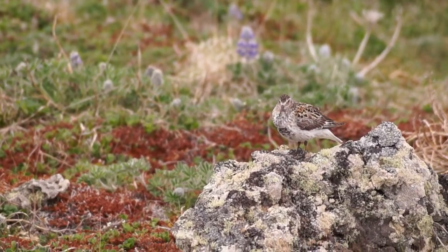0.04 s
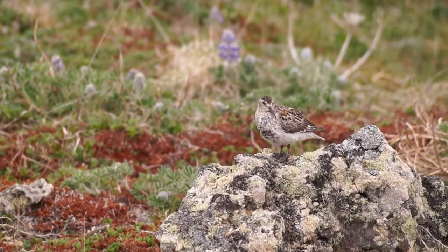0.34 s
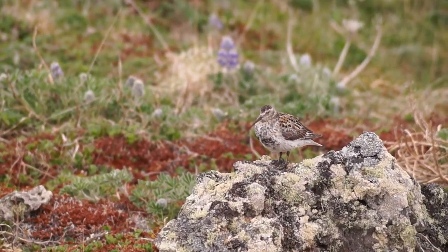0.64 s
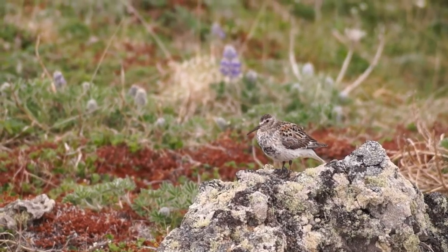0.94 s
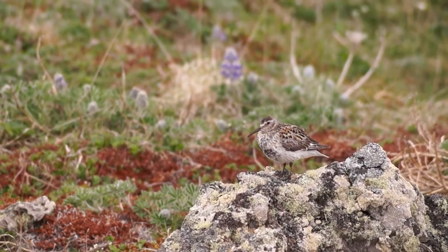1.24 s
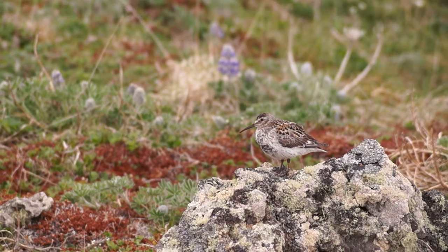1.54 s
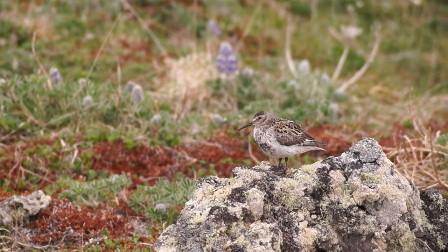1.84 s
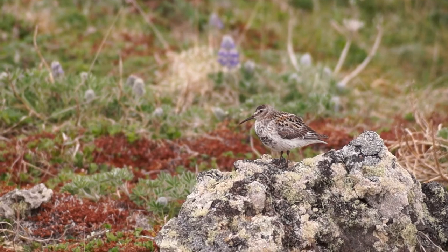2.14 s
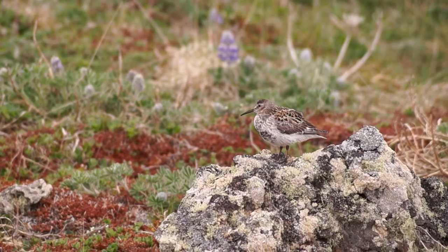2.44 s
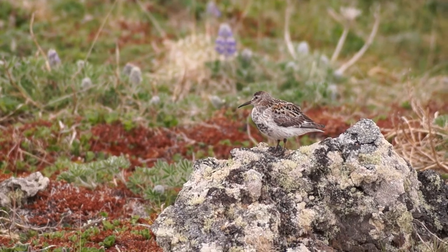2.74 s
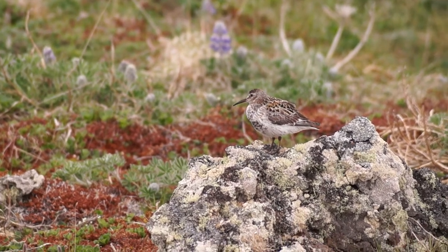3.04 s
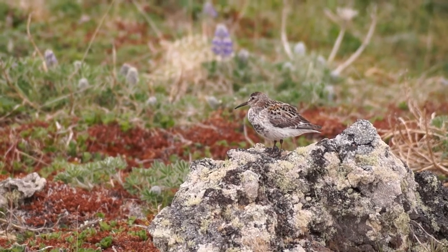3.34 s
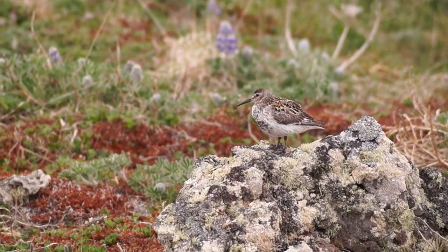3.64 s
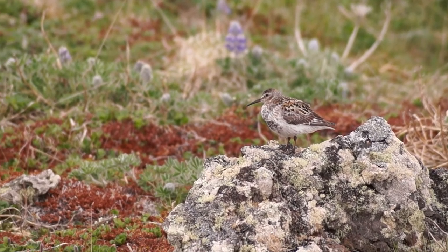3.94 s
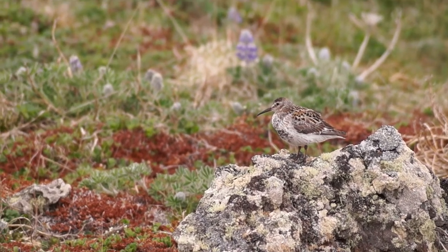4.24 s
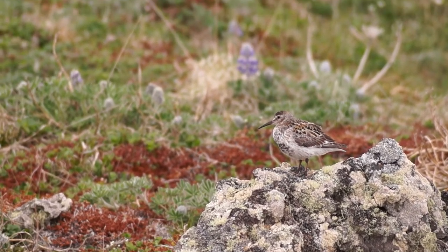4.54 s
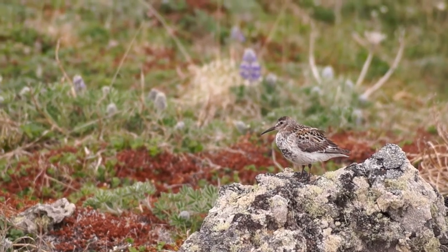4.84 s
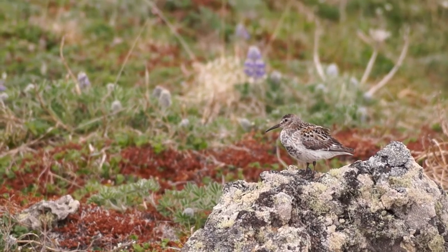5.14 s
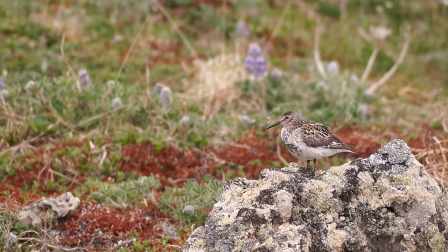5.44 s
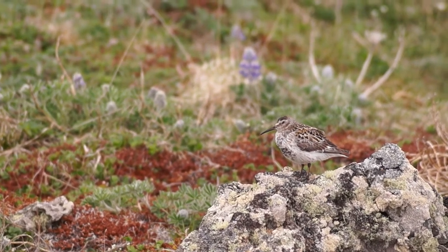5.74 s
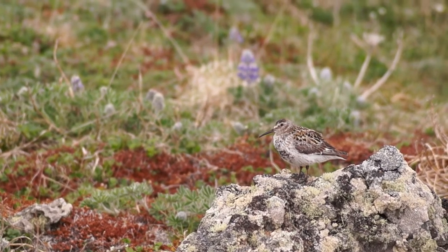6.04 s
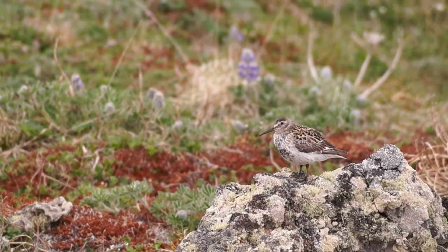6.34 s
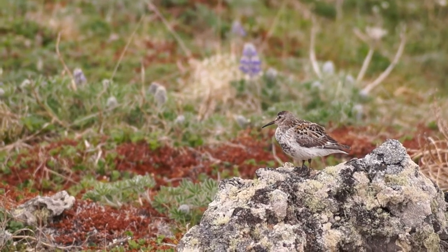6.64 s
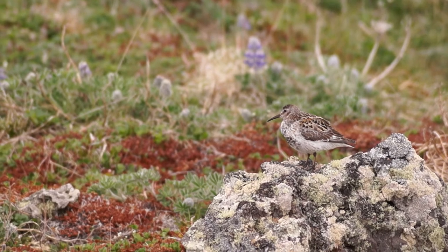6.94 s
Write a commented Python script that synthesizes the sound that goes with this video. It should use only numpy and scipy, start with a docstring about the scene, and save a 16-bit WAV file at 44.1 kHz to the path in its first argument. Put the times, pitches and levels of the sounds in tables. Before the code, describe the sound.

A soft, steady hiss of distant air runs throughout, in open tundra. Short puffs of wind bump the microphone in the first half second. From about 0.8 to 2 seconds a strong gust, the loudest sound, buffets it with low rumbling, thumps and brief spits; one tiny tick sounds on the left at 1.4 seconds. At about 1.7 seconds a small songbird, some way off to the right, begins a faint jingling phrase of high whistles, trills and buzzes. It repeats the phrase from about 3.8 seconds, fading out by 5.2. Separate wind puffs keep thumping under the song, the hardest near 2.7 seconds. A milder gust rumbles from 4.9 to 5.3 seconds, with a few small puffs just before 6. A second, far fainter bird calls behind the song and gives three tiny chips around 6.2 seconds. The wind settles, leaving hiss until about 7 seconds.

```python
"""Songbird on windy tundra

A small songbird sings one jingling phrase twice, some way off to the right. The two sides of its
voice box overlap pure whistles with warbled trills and buzzes; a second bird calls far off.
Gusts buffet the microphone's two ports with rumbling eddies, thumps and spits, over a steady
hiss of far air. One tiny tick sounds on the left."""
import sys
import numpy as np
from scipy import signal
from scipy.fft import rfft, irfft, next_fast_len
from scipy.io import wavfile
from scipy.ndimage import uniform_filter1d

SR = 44100
rng = np.random.default_rng(int(sys.argv[2]) if len(sys.argv) > 2 else 0)


def to_wav(s):
    """Save 16-bit WAV."""
    ch = np.atleast_2d(s).T  # columns
    pcm = np.round(np.clip(ch, -1, 1) * 32767)  # PCM
    wavfile.write(sys.argv[1], SR, pcm.astype(np.int16))


N = 312669


def gain_of(db):
    """Decibels to amplitude."""
    return 10 ** (np.asarray(db) / 20)


def unit_rms(x):
    """Scales to an rms of one."""
    return x / np.sqrt(np.mean(x ** 2) + 1e-20)


def bins():
    """The frequencies of a full-length spectrum."""
    return np.fft.rfftfreq(N, 1 / SR)


def curve(points):
    """Draws breakpoints across the spectrum on a logarithmic frequency axis."""
    hz, value = np.transpose(points)
    return np.interp(np.log(bins() + 1), np.log(hz + 1), value)


def add(mix, start_s, sound):
    """Mixes a sound in at its start time."""
    part = mix[max(round(start_s * SR), 0):][:len(sound)]
    part += sound[:len(part)]


def wander(rate_hz):
    """Smooth random modulation of unit rms, moving at up to about the given rate."""
    size = next_fast_len(N, True)
    smooth = np.exp(-(np.fft.rfftfreq(size, 1 / SR) / rate_hz) ** 2)
    return unit_rms(irfft(rfft(rng.standard_normal(size)) * smooth, size)[:N])


def jitter(count, span):
    """A short random wobble of unit rms, smoothed over span samples."""
    return unit_rms(uniform_filter1d(rng.standard_normal(count + span), span)[:count])


def port_noise(coherence, lead):
    """Spectra of white noise at two microphone ports, partly alike, the right one lagging."""
    left, other = rfft(rng.standard_normal((2, N)))
    shared = np.clip(curve(coherence), 0, 1)
    right = shared * left + np.sqrt(1 - shared ** 2) * other
    return np.array([left, right * np.exp(-1j * curve(lead))])


def coloured(spectra, colour):
    """Turns noise spectra into sound with the given EQ curve and unit rms."""
    return unit_rms(irfft(spectra * gain_of(curve(colour)), N))


# tone of the air bed: (frequency [Hz], relative level [dB])
AIR_COLOUR = [(12, -39), (20, -6), (56, -12), (161, -26), (215, -8), (312, -2), (463, -5), (528, -5.5),
              (572, -4), (872, -4.5), (969, -6.5), (1440, -9), (1830, -12), (2080, -15), (11000, -28),
              (14300, -61), (22000, -120)]
# how alike its two sides are: (frequency [Hz], coherence [0-1])
AIR_COHERENCE = [(60, 0.54), (170, 0.53), (300, 0.87), (500, 0.65), (900, 0.96), (1500, 0.2), (2500, 0.033),
                 (5000, 0.04), (10000, 0.42)]
# how far its left side leads: (frequency [Hz], phase [rad])
AIR_PHASE = [(100, 0.11), (330, 0.3), (900, 1), (1500, 0.007), (3000, 0.27)]
# its lean in the stereo field: (frequency [Hz], left minus right [dB])
AIR_PAN = [(100, 5), (400, -3), (1300, -4), (3000, -0.5), (9000, 0.1)]


def far_air(level_db=-50.5, sway_db=0.95, sway_hz=0.5):
    """A bed of distant wind and microphone hiss, swaying gently in level."""
    pan = gain_of(np.outer([.5, -.5], curve(AIR_PAN)))
    sway = gain_of(level_db + sway_db * wander(sway_hz))
    return sway * coloured(port_noise(AIR_COHERENCE, AIR_PHASE) * pan, AIR_COLOUR)


# the breeze under everything: (time [s], strength [dB])
BREEZE_ENVELOPE = [(0, -57), (.72, -62), (2.05, -41), (3.3, -44.5), (3.42, -59), (3.62, -56), (4.05, -51.5),
                   (4.5, -55.5), (5.55, -61.5), (6.1, -64.5), (7.09, -66)]
# short separate puffs: (peak time [s], length [s], strength [dB])
WIND_PUFFS = [(0.031, 0.097, -29), (0.292, 0.055, -42), (0.409, 0.036, -24.5), (0.488, 0.11, -37),
              (2.055, 0.034, -28.5), (2.19, .04, -36.5), (2.287, 0.021, -43), (2.39, 0.064, -40),
              (2.521, 0.022, -30.5), (2.594, 0.042, -29.5), (2.649, .05, -20.5), (2.782, 0.042, -25.5),
              (2.884, 0.065, -38.5), (2.97, 0.04, -32), (3.118, 0.024, -28.5), (3.265, 0.074, -31.5),
              (3.707, .09, -32), (3.841, 0.039, -31), (4.091, 0.036, -39), (4.336, 0.022, -39.5),
              (4.675, 0.03, -41), (5.686, 0.06, -33.5), (5.829, 0.063, -39.5), (5.929, 0.048, -44.5),
              (6.756, .12, -57)]
# two long gusts, strong then mild: (time [s], relative strength [dB])
STRONG_GUST_ENVELOPE = [(0.755, -46), (0.769, -24.5), (0.851, -16), (0.887, -32), (0.905, -17.5),
                        (1.077, -19.5), (1.189, -30), (1.223, -15.5), (1.239, -25.5), (1.605, -21.5),
                        (1.623, -20), (1.751, -28.5), (1.845, -20.5), (1.861, -25), (1.923, -31),
                        (1.953, -21), (2.117, -43.5), (2.15, -54)]
MILD_GUST_ENVELOPE = [(4.8, -72), (4.866, -37.5), (5.112, -33), (5.148, -38.5), (5.268, -38), (5.5, -62.5)]


def wind_strength(strong_db=2.5, mild_db=1.0, flutter_db=1.5, flutter_hz=18):
    """The wind's envelope in dB: a fluttering breeze and gusts add their power to bell-shaped puffs."""
    t = np.arange(N) / SR
    sustained = gain_of(np.interp(t, *np.transpose(BREEZE_ENVELOPE))) ** 2
    for gust, trim_db in ((STRONG_GUST_ENVELOPE, strong_db), (MILD_GUST_ENVELOPE, mild_db)):
        gust_db = np.interp(t, *np.transpose(gust), left=-np.inf, right=-np.inf)
        sustained += gain_of(gust_db + trim_db) ** 2
    puffs = sum(gain_of(db) ** 2 * np.exp(-(2 * (t - peak) / length) ** 2)
                for peak, length, db in WIND_PUFFS)
    flutter = gain_of(flutter_db * wander(flutter_hz))
    return 10 * np.log10(sustained * flutter ** 2 + puffs)


# tone of the turbulence: (frequency [multiples of the eddy rate], relative level [dB])
EDDY_COLOUR = [(.1, -28), (.2, -16.5), (.45, -4.5), (.85, 2), (1.3, -2.5), (2, -13), (3.3, -27.5), (6, -34),
               (10, -58), (20, -84), (60, -100)]
# surges that brighten the strong gust: (time [s], eddy rate [Hz])
GUST_SURGES = [(.76, 150), (.85, 308), (.91, 190), (1.01, 300), (1.12, 187), (1.23, 257), (1.34, 205),
               (1.53, 302), (1.68, 226), (2.1, 155)]
# how alike the wind is at the two ports: (frequency [Hz], coherence [0-1])
WIND_COHERENCE = [(50, 0.92), (130, 0.93), (300, 0.93), (500, 0.73), (900, 1), (2000, 0.68), (4000, 0.49)]
# how far the left port leads: (frequency [Hz], phase [rad])
WIND_PHASE = [(30, .1), (110, 0.69), (230, 1.31), (480, 1.67), (750, 2), (1400, 2.27), (2200, 3.1)]


def eddies(strength_db, calm_hz=91, gust_hz=155, full_gust_db=-14, doubling_db=13.5):
    """Eddies pass faster as the wind strengthens or surges, so their rumble slides upward."""
    eddy_hz = calm_hz + gust_hz * 2 ** ((strength_db - full_gust_db) / doubling_db)
    surge_hz = np.interp(np.arange(N) / SR, *np.transpose(GUST_SURGES), left=0, right=0)
    eddy_hz = np.where(surge_hz > 0, surge_hz, eddy_hz)
    noise, rumble = port_noise(WIND_COHERENCE, WIND_PHASE), 0
    rates_hz = np.geomspace(90, 340, 5)
    for rate, share in zip(rates_hz, np.eye(len(rates_hz))):
        colour = [(multiple * rate, db) for multiple, db in EDDY_COLOUR]
        crossfade = np.interp(eddy_hz, rates_hz, share)
        rumble = rumble + crossfade * coloured(noise, colour)
    return rumble


def buffeting(level_db=-1.02, right_db=0.65, lumps_db=3.0, lumps_hz=50,
              fine_hz=800, crackle_db=8.0, crackle_hz=110):
    """Turbulence at the ports: a lumpy rumble whose finest eddies come in crackling bursts."""
    strength_db = wind_strength()
    flow = eddies(strength_db)
    fine = irfft(rfft(flow) / (1 + (fine_hz / (bins() + 1)) ** 4), N)
    bursts = unit_rms(gain_of(crackle_db * wander(crackle_hz)))
    flow += fine * (bursts - 1)
    flow *= gain_of(lumps_db * wander(lumps_hz))
    flow /= np.sqrt(uniform_filter1d((flow ** 2).mean(0), size=2000))  # lumps share the gust's energy
    return flow * gain_of(strength_db + level_db) * gain_of([[0], [right_db]])


# the hardest single eddies: (time [s], relative peak [dB])
EDDY_HITS = [(0.403, -16), (0.417, -10.5), (0.774, -15.5), (0.794, -17), (0.901, -9), (1.063, -7.5),
             (1.446, -10), (1.843, -3.5), (1.957, -7.5), (2.59, -16), (2.651, -17), (3.265, -19.5),
             (3.821, -22.5), (4.09, -29), (5.67, -20)]


def thumps(level_db=-3, half_width_s=0.00095, crossing_s=0.0011):
    """An eddy gives one push and pull of pressure, at the left port and then the right."""
    out, t = np.zeros((2, N)), np.arange(SR // 50) / SR
    u = (t - t.mean()) / half_width_s
    for time, db in EDDY_HITS:
        push_pull = -gain_of(db + level_db) * u * np.exp((1 - u ** 2) / 2)
        add(out[0], time - t.mean(), push_pull)
        add(out[1], time - t.mean() + crossing_s, push_pull)
    return out


# bright accents in the strong gust: (time [s], relative level [dB])
GUST_SPITS = [(0.8564, -34), (0.8977, -35), (1.004, -27), (1.0125, -42), (1.4686, -37), (1.5035, -35),
              (1.5156, -25.5), (1.729, -31.5)]


def spits(level_db=-4, half_width_s=0.0017, delay_s=0.0011):
    """At the height of a gust the air tears at the ports in brief, brighter spits."""
    t = np.arange(N) / SR
    bursts = sum(gain_of(db + level_db) * np.exp(-((t - time - delay_s) / half_width_s) ** 2)
                 for time, db in GUST_SPITS)
    colour = [(300, -20), (800, -2), (1500, 0), (2400, -5), (3500, -21), (9000, -52)]
    return bursts * coloured(port_noise(WIND_COHERENCE, WIND_PHASE), colour)


def wind(ceiling=0.31):
    """Turbulence, thumps and spits together; the strongest pushes are soft-clipped."""
    return ceiling * np.tanh((buffeting() + thumps() + spits()) / ceiling)


def tick(time_s=1.4233, left_db=-18, right_db=-31, decay_s=.00008):
    """One tiny sharp click, mostly on the left: a sudden jump that sinks back at once."""
    out, t = np.zeros((2, N)), np.arange(SR // 200) / SR
    for side, db in zip(out, (left_db, right_db)):
        add(side, time_s, gain_of(db) * np.exp(-t / decay_s))
    return out


def whistle(hz):
    """A sine of unit rms that follows a pitch curve."""
    return np.sqrt(2) * np.sin(2 * np.pi * np.cumsum(hz) / SR)


def warble(count, rate_hz, depth_hz, uneven=0.052, jitter_hz=45, throb=0.36, skew=0.13, widening=0.81):
    """Pitch swing and airflow of a warble: they move together, a little unevenly, and the swing widens."""
    cycle = 2 * np.pi * np.cumsum(rate_hz * (1 + uneven * jitter(count, span=300))) / SR
    swing = np.sin(cycle + skew * np.sin(cycle))  # leaps up, slides down
    swing *= 1 + widening * np.linspace(-.5, .5, count)
    airflow = unit_rms(1 + throb * np.sin(cycle - 1.0))  # loudest on the way down
    return depth_hz * swing + jitter_hz * jitter(count, span=60), airflow


def leap(t, under=0.306, over=0.093, rise_s=0.006, settle_s=0.005, accent_db=1.5, fade=.3):
    """Pitch ratio and envelope of an accented attack that starts flat, overshoots and settles."""
    rise = np.minimum(t / rise_s, 1)
    settle = np.exp(-np.maximum(t - rise_s, 0) / settle_s)
    release = np.minimum((1 - t / t[-1]) / fade, 1)
    ratio = 1 - under * (1 - rise) + over * rise * settle
    return ratio, np.sqrt(rise) * gain_of(accent_db * settle) * release


# warble textures by name: (rate [Hz], depth [Hz])
WARBLE_TEXTURES = {"purr": (100, 200), "trill": (88, 235), "burr": (260, 87), "quiver": (118, 224),
                   "buzz": (270, 220), "rasp": (290, 430)}


def note(length, first_hz, last_hz, db, swell_db, manner, bend=.87, jitter_hz=16, fade=0.45):
    """One side of the voice box glides, fastest at first: pure, leaping into its pitch, or warbling."""
    t = np.arange(max(round(length * SR), 64)) / SR
    progress = t / t[-1]
    hz = first_hz + (last_hz - first_hz) * progress ** bend + jitter_hz * jitter(len(t), span=90)
    envelope = signal.windows.tukey(len(t), fade)
    if manner == "leap":
        ratio, envelope = leap(t)
        hz *= ratio
    if manner in WARBLE_TEXTURES:
        swing_hz, airflow = warble(len(t), *WARBLE_TEXTURES[manner])
        hz += swing_hz
        envelope *= airflow
    return gain_of(db + swell_db * (progress - .5)) * envelope * whistle(hz)


def chirp_run(first_hz, db, fade_db, count=4, spacing_s=.0205, length_s=0.024, step_hz=-190, rise_hz=560):
    """Evenly spaced upward curls that step down in pitch and level."""
    out, progress = np.zeros(SR // 4), np.linspace(0, 1, round(length_s * SR))
    envelope = signal.windows.tukey(len(progress), 0.62)
    for k in range(count):
        hz = first_hz + k * step_hz + rise_hz * progress ** 2
        add(out, k * spacing_s, gain_of(db + k * fade_db) * envelope * whistle(hz))
    return out


def sheen(song, level_db=-14.5, beak_hz=10300, width_hz=1400):
    """The voice box's two sides mix into overtones and sum tones; only the highest pass the beak."""
    envelope = np.sqrt(abs(uniform_filter1d(song ** 2, size=200)) + 1e-10)
    beak = np.exp(-((bins() - beak_hz) / width_hz) ** 2)
    return gain_of(level_db) * irfft(rfft(song ** 2 / envelope) * beak, N)


def ground_scatter(x, t60_s=0.42, echoes_per_s=2000):
    """Rocks and tussocks return a short spray of echoes."""
    t = np.arange(SR // 2) / SR
    sparse = rng.random((2, len(t))) < echoes_per_s / SR
    taps = rng.standard_normal((2, len(t))) * sparse * gain_of(-60 * t / t60_s)
    return signal.fftconvolve(x[None], taps / np.linalg.norm(taps[0]), axes=1)[:, :N]


# the syllable palette, before each cue's trim, transpose and stretch; overlapping notes come from the
# two sides of the voice box:
# (delay [s], length [s], first pitch [Hz], last pitch [Hz], level [dB], swell [dB], manner)
SYLLABLE_NOTES = { "pip": [(0, 0.061, 2787, 2910, -49, -26, "pure"),
                  (0, .029, 2750, 2785, -50, -6, "buzz")],
                  "swoop": [(0, 0.066, 5320, 5280, -53, 35, "pure"),
                  (.036, .051, 5550, 4680, -42.5, 2, "rasp"), (.075, .031, 4980, 4250, -43.5, 0, "pure"),
                  (.101, 0.02, 5500, 5150, -47.5, -17, "leap")],
                  "rattle": [(0, 0.1, 2980, 2870, -50.5, -2, "trill"),
                  (0.034, 0.19, 3400, 3470, -56, -12, "pure"), (0.11, 0.122, 2200, 2280, -55, -3, "pure"),
                  (.017, 0.03, 4220, 4270, -58.5, 0, "rasp"), (.074, .022, 4600, 4450, -58, 6, "rasp"),
                  (.132, .04, 4350, 4400, -62, -6, "rasp")],
                  "tink": [(0, .005, 5950, 7600, -50, 5, "pure")],
                  "slide": [(0.0042, .086, 4080, 3560, -43, 8, "buzz")],
                  "low slide": [(0.0019, .061, 3750, 3130, -52, 16, "rasp")],
                  "churr": [(0.00058, 0.068, 2430, 2450, -51, -8, "purr")],
                  "tsee": [(0, .004, 3400, 5200, -54.5, -11, "pure"),
                  (.014, 0.028, 7150, 6750, -51, 3, "buzz"), (.043, .022, 5360, 5180, -57.5, 21, "pure"),
                  (.063, 0.0055, 5840, 3600, -52.5, -29, "pure")],
                  "sigh": [(0, 0.063, 3270, 3080, -48.5, -4, "pure"),
                  (.063, 0.041, 2950, 2810, -36.5, 4, "pure"),
                  (.094, 0.049, 2830, 2780, -42.5, -7, "pure")],
                  "yodel": [(0, .013, 2870, 3100, -49, 12, "pure"),
                  (.005, 0.02, 2290, 2250, -54, -12, "pure"), (.023, 0.01245, 4460, 4070, -46, 9, "pure"),
                  (.035, .057, 4930, 4960, -50, -4, "leap"), (.038, 0.047, 2990, 2936, -51.5, 2, "pure"),
                  (.095, 0.0055, 6480, 4200, -42.5, -3, "pure"),
                  (.093, 0.051, 4470, 3800, -44.5, 5, "burr")],
                  "fall": [(0, .008, 2400, 3050, -43.5, 11, "pure"),
                  (.006, 0.047, 2580, 2580, -57, -15, "pure"), (.008, .065, 4620, 4240, -42.5, 7, "pure"),
                  (.054, .091, 4260, 3830, -47.5, -13, "quiver")],
                  "slur": [(0, 0.054, 3680, 3070, -47.5, 2, "pure")],
                  "hoot": [(0, 0.087, 2108, 2124, -41, -6, "pure")],
                  "scrape": [(0, 0.059, 4800, 5120, -54, 2, "rasp"),
                  (.014, .045, 4360, 4000, -49, 11, "burr"), (.048, .078, 4070, 3260, -40.5, 1, "buzz"),
                  (.112, .059, 3410, 3080, -49, -14, "pure")],
                  "high yodel": [(0, 0.0435, 5250, 5370, -50.5, 24, "pure"),
                  (.042, .006, 3700, 7000, -46, 3, "pure"), (.047, 0.017, 6800, 6140, -46.5, -4, "pure"),
                  (.056, .068, 6170, 6020, -48, -12, "pure"), (.043, 0.11, 3830, 3200, -53.5, -10, "pure"),
                  (.126, .115, 3210, 2936, -42.5, -11, "pure"), (.13, 0.064, 4790, 4670, -59, -2, "pure")],
                  "hook": [(0, .077, 4130, 2910, -42, 9, "burr"),
                  (.067, 0.072, 3930, 3770, -48.5, -4, "leap"), (.109, .029, 2940, 2740, -43.5, 16, "pure"),
                  (.127, .09, 2890, 2820, -46, -9, "trill"), (.136, 0.0795, 2430, 2330, -52.5, -6, "purr")]}
# a phrase that builds, three linking syllables, then the phrase again, fading:
# (time [s], trim [dB], transpose [semitones], stretch [ratio], syllable)
SONG_CUES = [(1.67, -11, 0.033, 0.74, "pip"), (1.788, -4.5, -0.77, 0.72, "rattle"),
             (2.037, -3, 0, 1, "tink"), (2.075, 0, 0.056, 1, "low slide"), (2.27, 0, 0.45, 0.95, "churr"),
             (2.37, 1.5, -0.28, 0.98, "tsee"), (2.45, 0, -0.074, 1.05, "sigh"),
             (2.637, 0.5, -0.14, 1.04, "yodel"), (2.692, 0.5, 0.13, 1.1, "slur"),
             (2.813, 0, -0.03, 0.96, "fall"), (2.945, -2, 0.02, 1.17, "hoot"),
             (3.085, 1, -0.14, 1.02, "scrape"), (3.225, 0.5, -0.0076, 1.04, "high yodel"),
             (3.511, 0, 0.025, 1, "hook"), (3.757, 1, -0.19, 1.14, "pip"), (3.774, 0, -0.04, 1.03, "swoop"),
             (3.898, 0.5, 0, 1, "rattle"), (4.183, 0, 0.2, 1, "tink"), (4.201, 0.5, 0, 0.98, "slide"),
             (4.413, -4, -.2, 1.1, "churr"), (4.513, 0.5, -0.06, 1.06, "tsee"),
             (4.602, -12.5, -0.31, 1.1, "sigh"), (4.797, -4, -0.12, 0.96, "yodel"),
             (4.971, -7.5, -0.06, 1.11, "fall"), (5.105, -11.5, -0.53, 1.06, "hoot")]
# each slide breaks up into chirps: (time [s], first pitch [Hz], level [dB], fade per chirp [dB])
SLIDE_CHIRPS = [(2.126, 3040, -45.5, -2), (4.273, 3130, -47, -3.5)]


def songbird(left_db=-8, right_db=0.1, scatter_db=-16.5):
    """The lead bird strings its syllables together, off to the right, with faint ground echoes."""
    song = np.zeros(N)
    for start, trim_db, semitones, stretch, syllable in SONG_CUES:
        pitch = 2 ** (semitones / 12)
        for delay, length, first_hz, last_hz, db, swell_db, manner in SYLLABLE_NOTES[syllable]:
            sung = note(stretch * length, pitch * first_hz, pitch * last_hz, db + trim_db, swell_db, manner)
            add(song, start + stretch * delay, sung)
    for start, *run in SLIDE_CHIRPS:
        add(song, start, chirp_run(*run))
    song += sheen(song)
    return song * gain_of([[left_db], [right_db]]) + gain_of(scatter_db) * ground_scatter(song)


# the background bird: (time [s], length [s], first pitch [Hz], last pitch [Hz], level [dB])
FAR_CALLS = [(1.737, .07, 3000, 3810, -70), (1.742, .02, 4200, 3750, -64), (2.235, 0.08, 3400, 4080, -64),
             (2.978, .05, 3300, 3430, -64), (3.02, 0.024, 3650, 3430, -58), (6.165, .015, 3920, 3650, -72),
             (6.213, 0.013, 3900, 3630, -62), (6.262, .022, 4000, 3650, -64)]


def far_bird(left_db=-3, right_db=0, scatter_db=-9):
    """A far fainter bird: thin upward whistles and a few chips, blurred by their echoes."""
    calls = np.zeros(N)
    for start, length, first_hz, last_hz, db in FAR_CALLS:
        add(calls, start, note(length, first_hz, last_hz, db, swell_db=0, manner="pure"))
    return calls * gain_of([[left_db], [right_db]]) + gain_of(scatter_db) * ground_scatter(calls)


def scene():
    """Birds, wind and air at the two ports."""
    return songbird() + far_bird() + wind() + far_air()


def low_pass(x, hz):
    """A steep high cut."""
    taps = signal.firwin(601, hz, window=("kaiser", 9), fs=SR)
    return signal.oaconvolve(x, taps[None], "same")


def record(dry, low_cut_hz=42, notch_hz=1850, notch_width_hz=110, notch_db=-7,
           top_hz=11080, tick_top_hz=16300):
    """The microphone has a low cut, one narrow dip and a dull top; the tick joins after and is brighter."""
    dip = gain_of(notch_db * np.exp(-((bins() - notch_hz) / notch_width_hz) ** 2))
    low_cut = 1 / np.sqrt(1 + (low_cut_hz / (bins() + 1)) ** 4)
    heard = low_pass(irfft(rfft(dry) * dip * low_cut, N), top_hz)
    return low_pass(heard + tick(), tick_top_hz)


dry = scene()
out = record(dry)
to_wav(out)
```